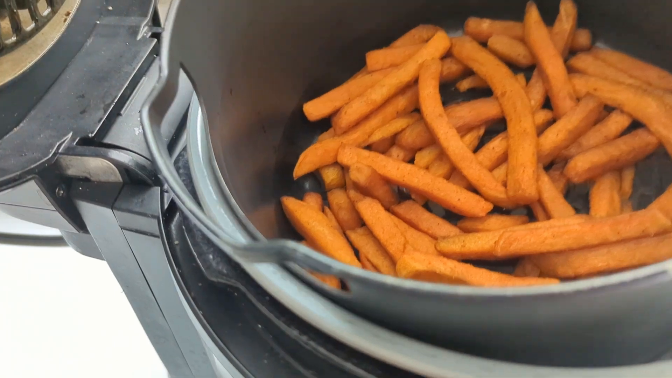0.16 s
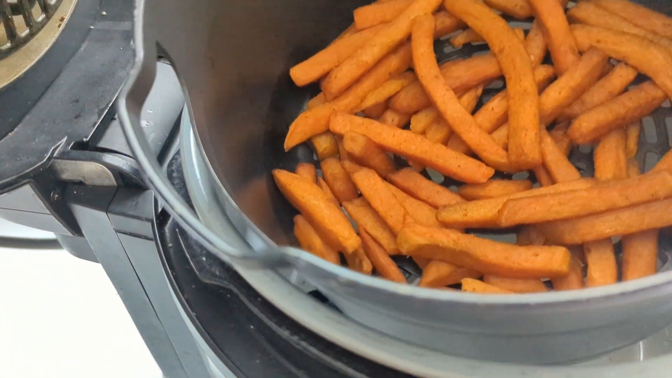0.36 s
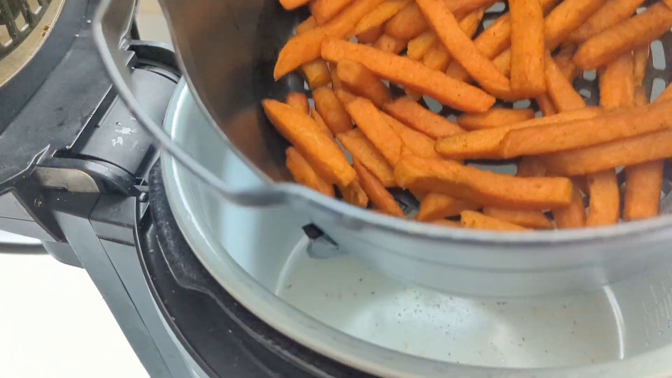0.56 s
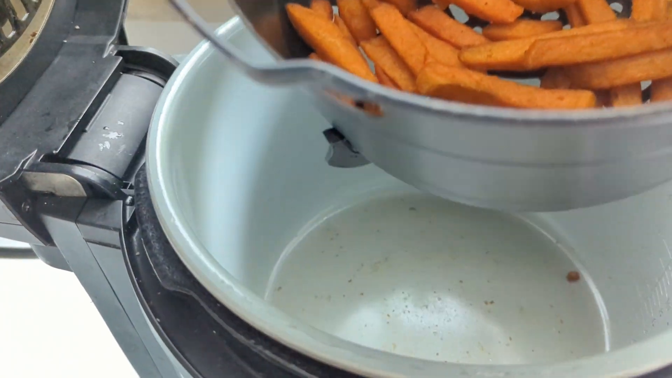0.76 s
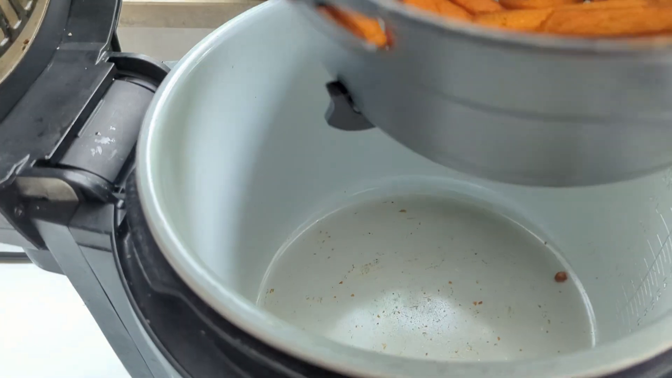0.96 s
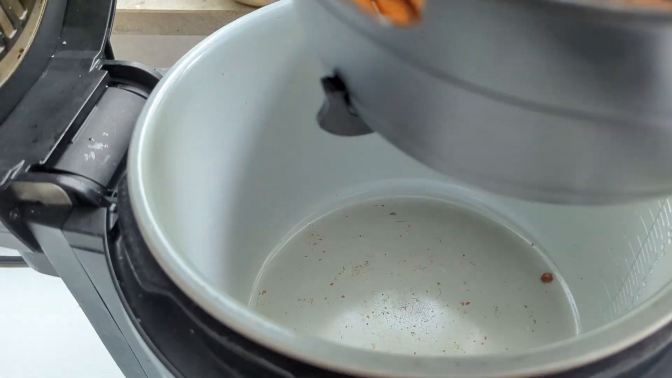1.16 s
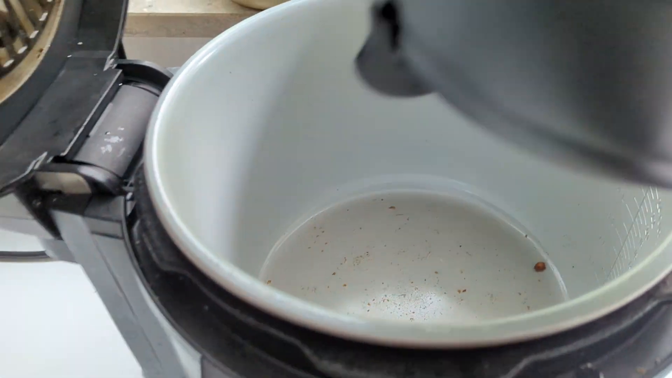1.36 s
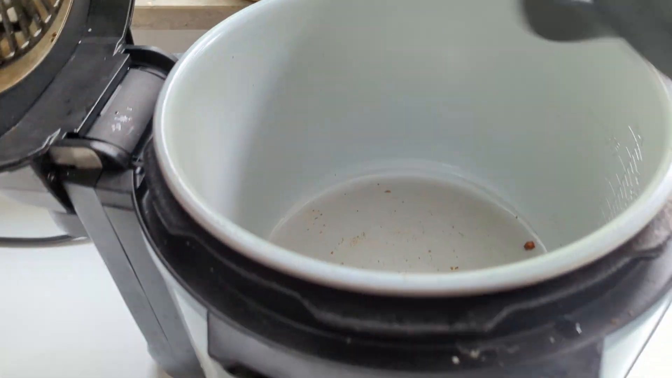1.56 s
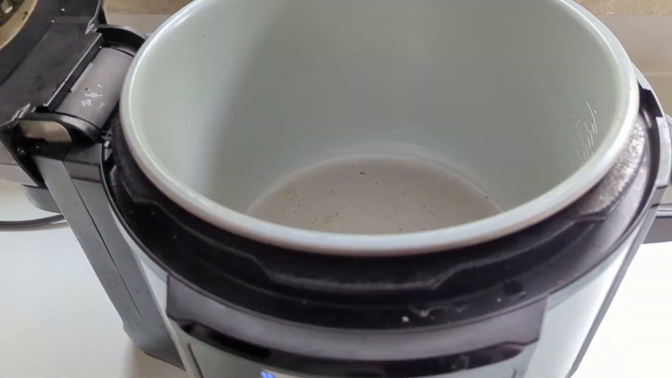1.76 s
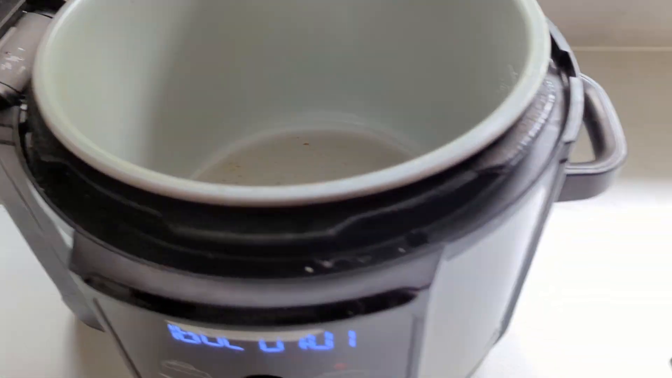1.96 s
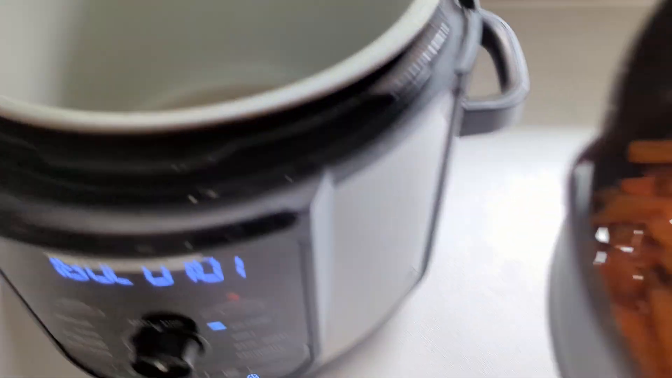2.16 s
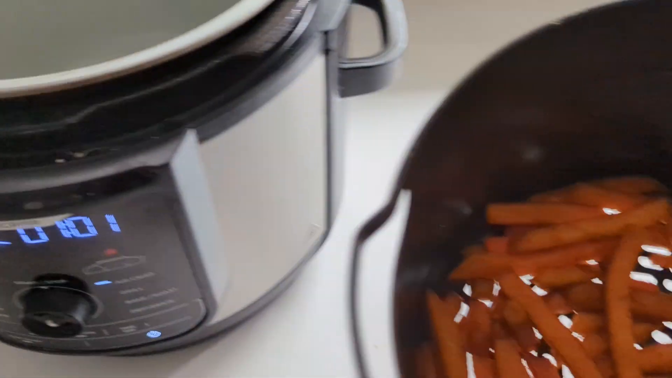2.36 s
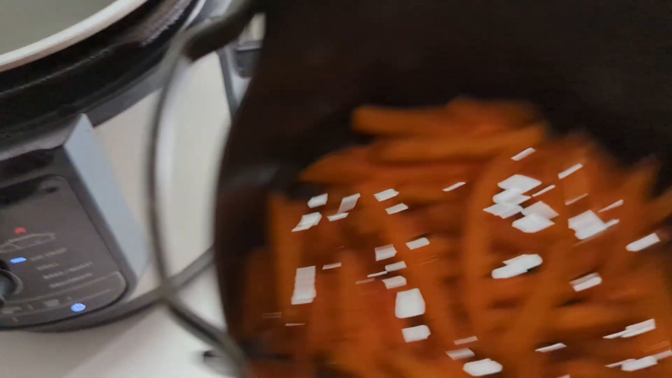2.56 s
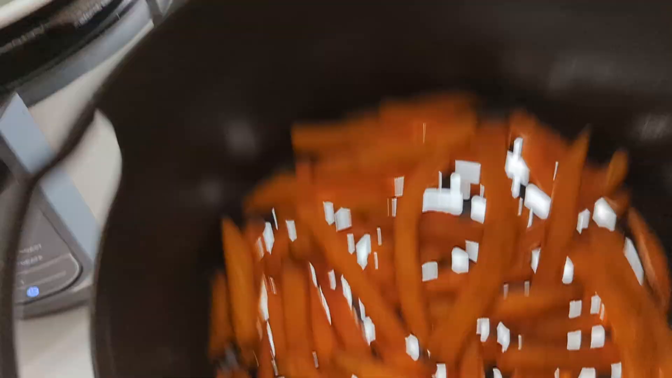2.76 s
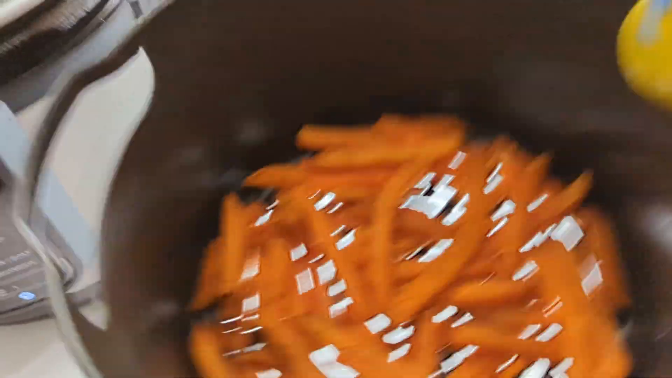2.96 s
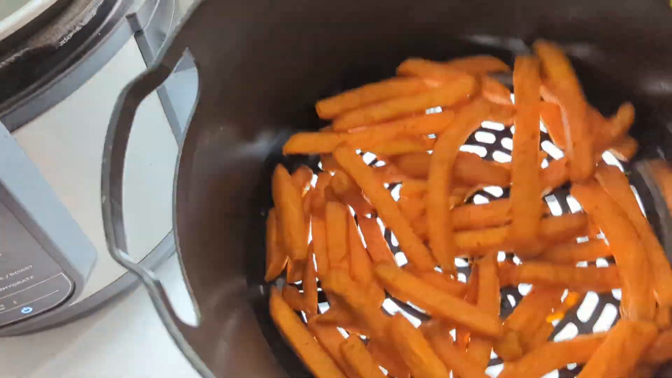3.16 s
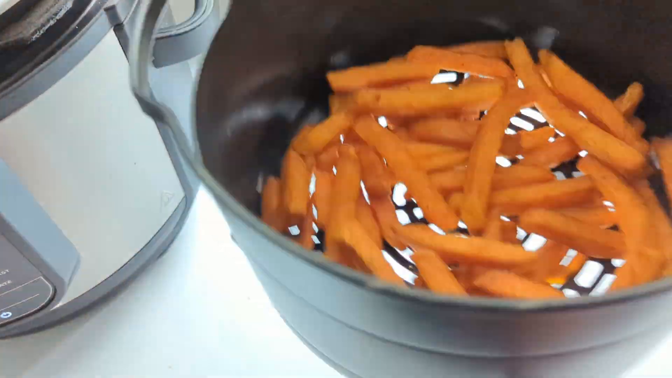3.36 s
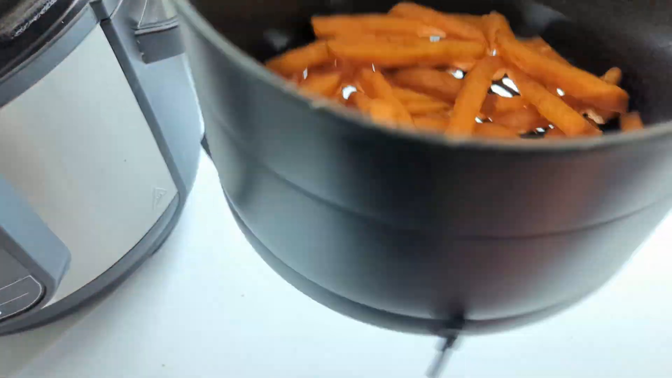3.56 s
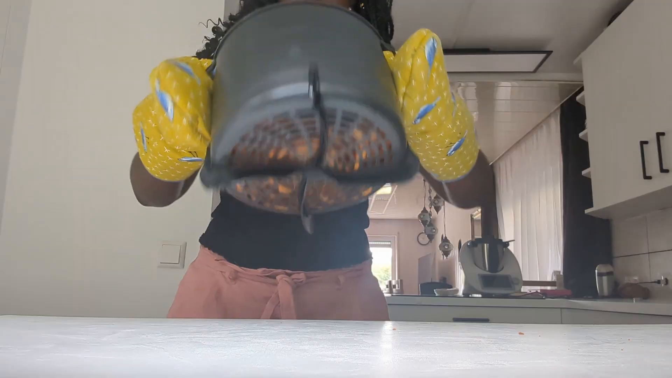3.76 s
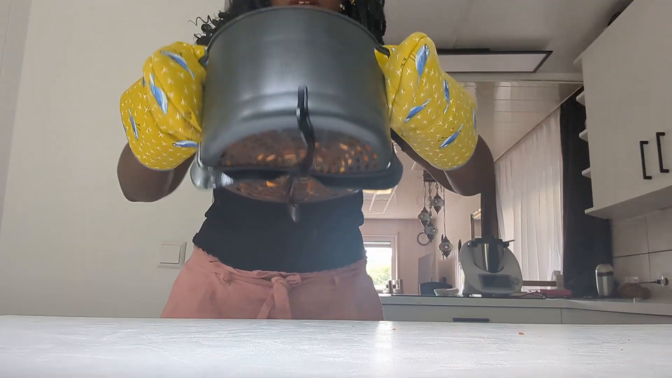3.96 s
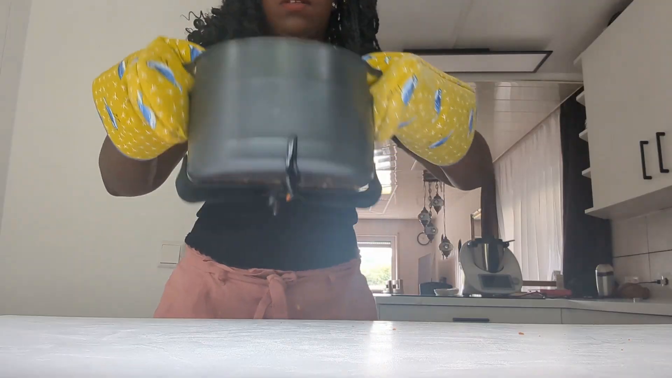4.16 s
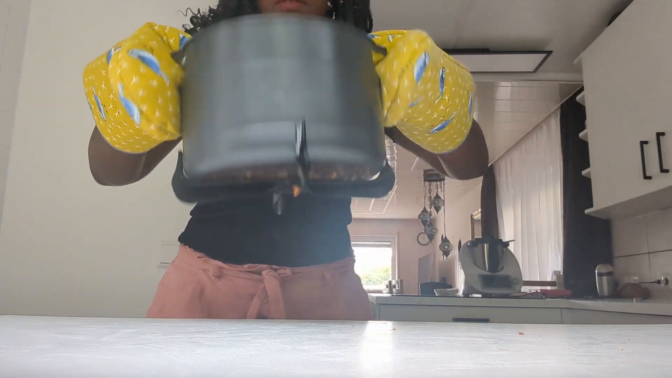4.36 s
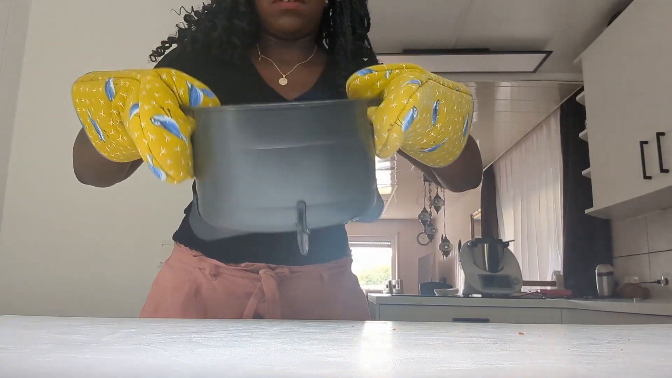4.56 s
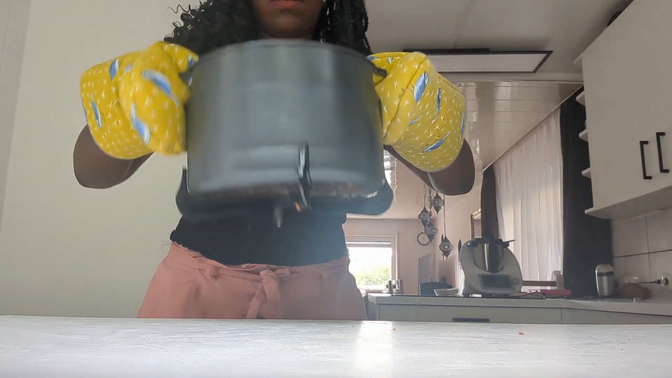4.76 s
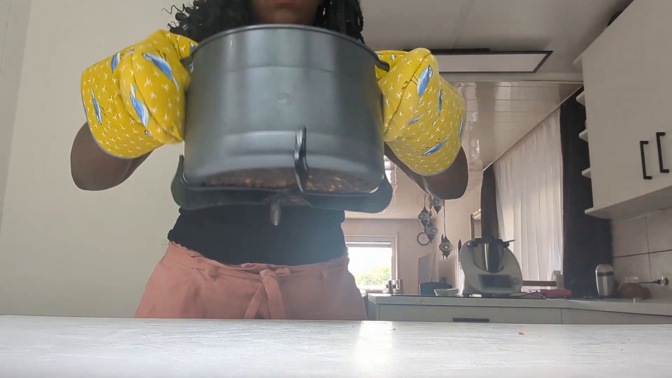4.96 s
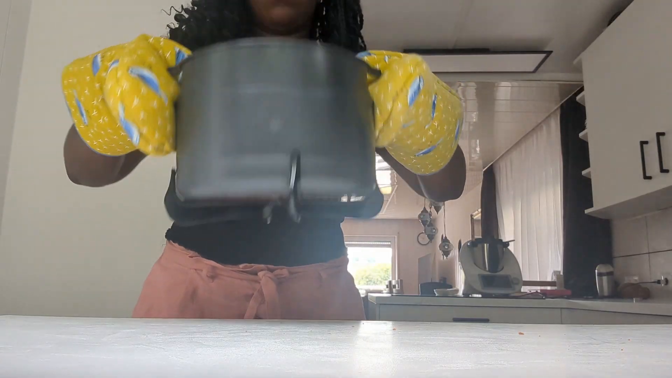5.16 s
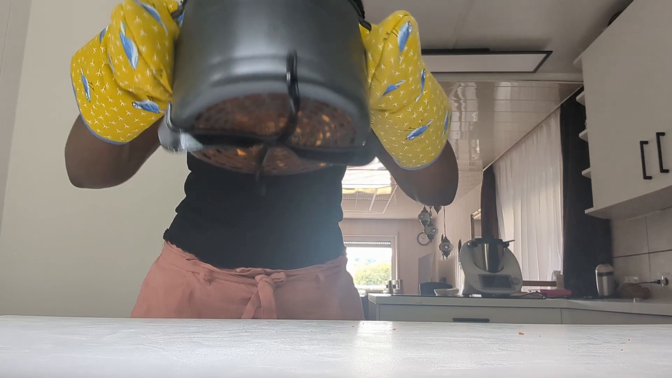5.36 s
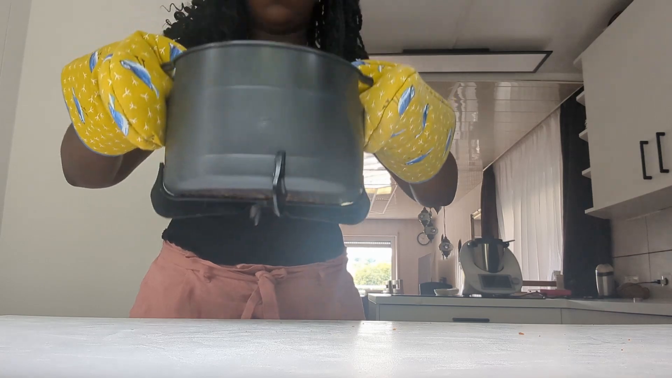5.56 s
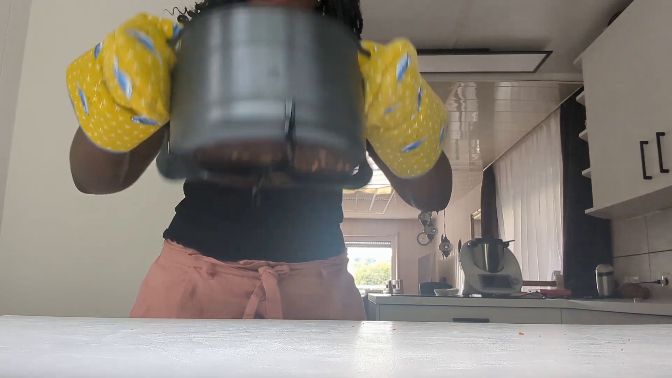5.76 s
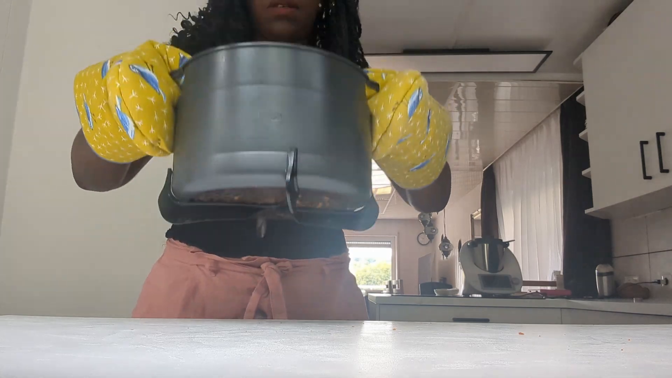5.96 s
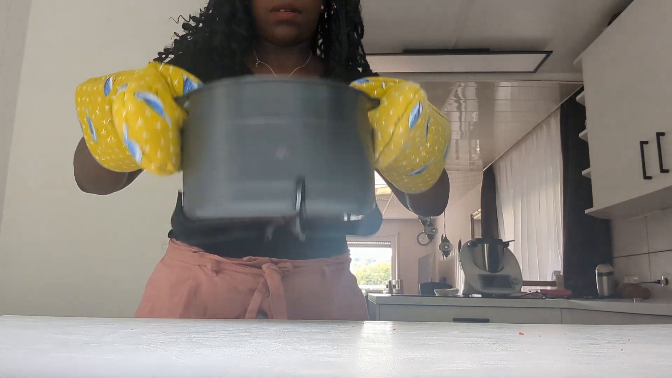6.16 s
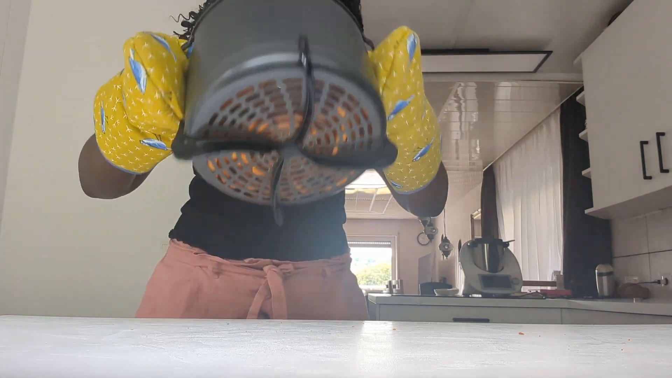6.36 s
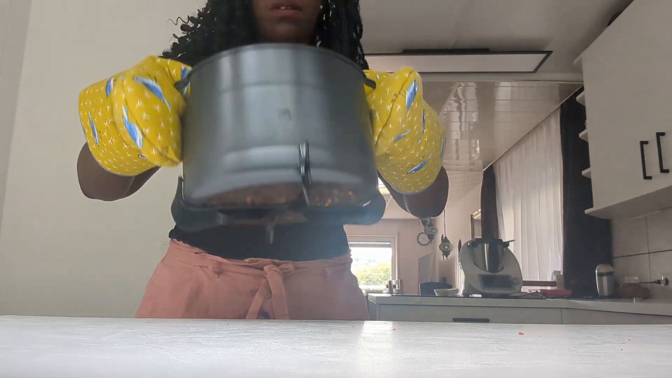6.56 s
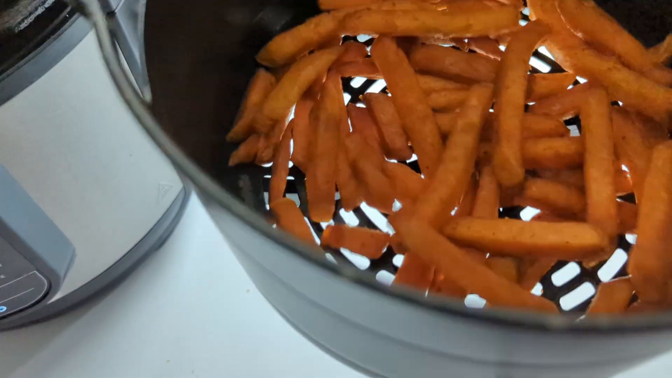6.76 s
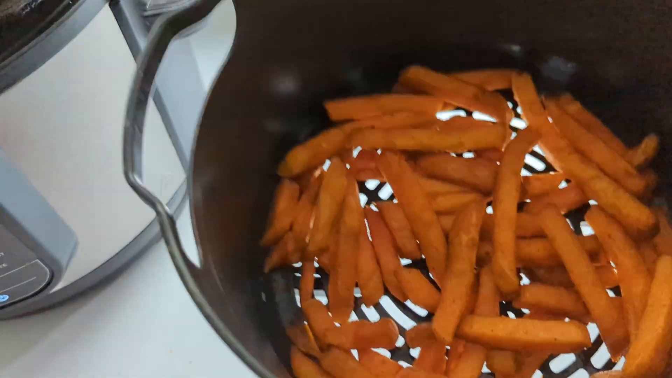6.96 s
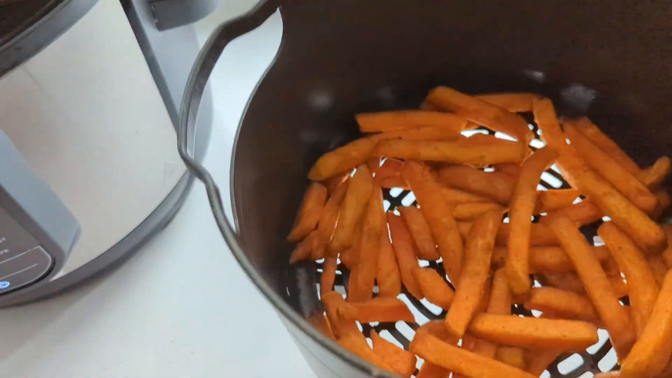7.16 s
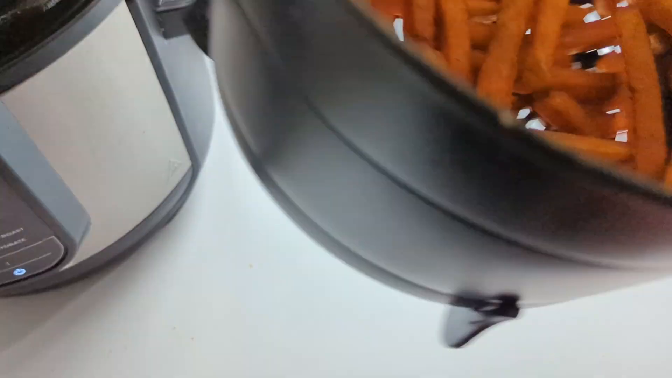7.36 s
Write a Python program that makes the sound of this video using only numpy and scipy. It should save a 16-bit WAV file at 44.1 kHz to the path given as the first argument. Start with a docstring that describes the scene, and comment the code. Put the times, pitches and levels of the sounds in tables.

```python
"""First heard is a metal air fryer basket dragged out of its pot: scrapes, pot thuds and rim clanks. One hard
knock excites the ringing of a small live kitchen and near echoes, all as decaying modes and noise. Fries slide
close by, then are tossed farther off: random grains are coloured by resonances and swell, hold and settle with
each stroke, while bursts of grains make clumps thud, slap and crackle on the perforated floor. Narrow noise
bands and a wavering sine give the faint appliance hum and a low-mid murmur; shaped noise gives rumble and hiss."""
import sys
import numpy as np
from scipy import signal
from scipy.fft import rfft, irfft, next_fast_len
from scipy.io import wavfile
from scipy.ndimage import uniform_filter1d

SR = 44100
rng = np.random.default_rng(int(sys.argv[2]) if len(sys.argv) > 2 else 0)


def put_to_file(sound):
    """Save the sound as 16-bit audio at rate SR, in the file named by the first command-line argument."""
    columns = np.atleast_2d(sound).T  # one column per channel
    safe = np.clip(columns, -1, 1)
    whole_steps = np.round(safe * 32767)
    wavfile.write(sys.argv[1], SR, whole_steps.astype(np.int16))


N = 327632
TIME = np.arange(N) / SR
RING = TIME[:SR // 2]  # time axis of a single hit, half a second
TOP_HZ = 15900  # upper band limit

# Levels in these tables are relative: each source adds its own trim.
# Tosses, each sending the heap across the basket: start_s, hold_s, level_db, brightness_db
TOSSES = [(3.888, 0.012, -50, -4.5), (3.925, 0.021, -49, -0.5), (4.137, 0.031, -46, 0),
          (4.385, 0.014, -52, -2.5), (4.495, 0.011, -49.5, 6.5), (4.575, .05, -51.5, 0.5),
          (4.795, 0.005, -58, 0), (4.935, 0.0067, -59.5, 3), (5.005, 0.065, -57, 4),
          (5.25, 0.023, -56, 0.5), (5.465, .02, -66, 5.5), (5.56, .07, -57.5, 2), (5.7, 0.018, -66, 1),
          (5.91, 0.022, -69.5, 8.5), (6.0, 0.058, -53.5, 3), (6.15, .04, -72.5, -4),
          (6.375, 0.061, -61.5, 8), (6.505, 0.05, -56, 3)]
# Slides of the fries in the tilting basket: start_s, hold_s, level_db, brightness_db
SLIDES = [(1.11, 0.055, -68.5, 4), (1.3, 0.18, -76, -3), (1.8, 0.14, -75, -2), (2.08, 0.087, -67, -6.5),
          (2.29, 0.18, -60, -6.5), (2.595, 0.082, -51, -4.5), (2.83, 0.043, -52.5, -4.5),
          (3.12, 0.037, -54, -3), (3.24, 0.017, -60, 6.5), (3.31, 0.044, -57.5, -4.5),
          (3.405, 0.023, -57, 4), (3.47, .035, -58, -3.5), (3.59, .03, -63, 9), (3.675, 0.02, -54, -0.5),
          (6.76, 0.076, -66.5, 3), (6.92, .02, -69, 3), (7.34, .03, -69, -10.5), (7.41, .02, -65, 7.5)]
# Clumps landing on the floor, soft ones dull and crusty ones bright: start_s, level_db, brightness_db
LANDINGS = [(2.588, -43.5, -2.5), (2.943, -49, 1.5), (3.055, -51, 4.5), (3.082, -57.5, 15), (3.18, -40, -5),
            (3.236, -52, 16.5), (3.338, -48, -2), (3.508, -47, -1), (3.886, -34.5, -4.5), (3.922, -36, 2.5),
            (4.114, -46.5, 0.5), (4.135, -33.5, -5.5), (4.200, -39, -3.5), (4.368, -44, -4.5),
            (4.429, -48.5, 17), (4.467, -42.5, 4.5), (4.542, -47.5, -14), (4.788, -54, -13),
            (4.992, -44.5, 3), (5.020, -56, -13), (5.046, -48.5, -25), (5.183, -63, -12),
            (5.518, -49, -0.5), (5.614, -47.5, 9.5), (5.793, -64, 11.5), (5.969, -54, 7), (6.028, -55, -4),
            (6.449, -51, 4), (6.734, -57.5, 6), (6.920, -63, 16)]
# Jump of the whole heap at the knock: delay_s, slap_level_db, crackle_level_db
JOLT = (.007, -23.5, -37.5)
# Brief dip of the rustle: middle_s, half_length_s, depth_db
LULL = (6.272, 0.047, 11)
# Stretch heard from farther off: start_s, end_s
FAR_SPAN = (3.733, 6.73)
# Spectrum of soft tumbling and floor thuds: frequency_hz, density_db_per_hz
THUD_SPECTRUM = [(30, -49.5), (65, -22.5), (140, -2.5), (260, 0), (380, 2), (560, 1.5), (800, -10.5),
                 (1500, -33.5), (4000, -66)]
# Spectrum of fries slapping the floor: frequency_hz, density_db_per_hz
SLAP_SPECTRUM = [(300, -18), (700, -5.5), (1300, -1.5), (2000, -1), (2600, -8), (5000, -20), (15000, -48)]
# Spectrum of fries rubbing: frequency_hz, density_db_per_hz
RUB_SPECTRUM = [(400, -30.5), (800, 2.5), (1400, 1), (2100, 4), (3600, -0.5), (4800, -2.5), (7000, -35.5)]
# Spectrum of scratching crusts: frequency_hz, density_db_per_hz
CRUST_SPECTRUM = [(1800, -56.5), (3300, -7), (5000, -9), (6200, -4), (8500, -6), (12000, -4.5),
                  (15800, -9.5)]
# Resonances of the basket's wall: frequency_hz, width_hz, level_db
SHELL_MODES = [(1915, 55, -3.5), (2616, 65, 0.5), (3150, 70, -2), (3680, 61, -4.5), (5330, 63, -20.5),
               (6130, 190, -9), (5800, 64, -14), (6920, 140, -5), (7510, 75, 3), (8700, 170, 1.5),
               (9880, 68, -2), (10150, 190, -2), (11700, 120, -7)]
# Bumps of basket against pot: start_s, thud_db, thud_pitch_hz, thud_rise_s, tap_db, clank_db
BUMPS = [(0.031, -48, 315, 0.066, -50.5, -79), (0.146, -34.5, 294, 0.0016, -60.5, -57),
         (0.461, -49.5, 239, 0.01, -70, -61), (0.892, -38.5, 297.6, 0.0089, -47, -32),
         (0.899, -37, 279.6, 0.0015, -52.5, -53), (0.917, -45, 237, 0.0013, -62, -47.5),
         (0.938, -40.5, 246, 0.00066, -52, -64), (1.060, -49, 254, 0.0025, -48.5, -64)]
# Modes of the pot: multiple_of_thud_pitch (ratio), level_db, t60_s
POT_MODES = [(.46, -17, 0.22), (.68, 0, 0.12), (1, 9.5, 0.074), (1.3, -3, 0.098), (1.76, -7, .11),
             (3.42, -14, 0.1)]
# Drags along the pot wall: start_s, hold_s, level_db
SCRAPES = [(0.023, 0.024, -55.5), (0.114, 0.055, -55), (0.276, .05, -55), (0.348, 0.12, -55)]
# Spectrum of contact with the pot wall: frequency_hz, density_db_per_hz
POT_WALL_SPECTRUM = [(700, -15.5), (1050, -5.5), (1400, 0), (2000, -13), (3500, -20.5), (6000, -15),
                     (9000, -26), (15000, -18)]
# Spectrum of metal chatter: frequency_hz, density_db_per_hz
CLANK_SPECTRUM = [(700, -16), (1300, -5.5), (2200, -11.5), (3400, -10.5), (4600, -7), (6500, -7.5),
                  (8000, -14.5), (11000, -19.5), (15000, -40)]
# Resonances of the basket's rim: frequency_hz, width_hz, level_db
RIM_MODES = [(1390, 94, 7), (1890, 84, 3), (2230, 180, 11.5), (2640, 90, 5), (2800, 160, 9),
             (3280, 300, 3.5), (4200, 440, -5), (6450, 400, -2.5)]
# Slowest-dying cluster of rim modes: frequency_hz, width_hz, level_db, t60_s
RIM_TAIL = (2697, 597, -16, 0.15)
# Spectrum of the knock's pulse: frequency_hz, density_db_per_hz
KNOCK_SPECTRUM = [(60, -58.5), (150, -28), (340, -20.5), (480, -8.5), (680, -9.5), (850, -1), (1280, -0.5),
                  (1600, -11), (2000, -23.5), (2900, -22), (4000, -39), (7000, -40.5), (15000, -63)]
# Ringing of the small room after the knock: frequency_hz, level_db, t60_s
ROOM_MODES = [(510, -13.5, 0.25), (605, -7, .18), (700, -13.5, .35), (858, -6, .35), (943, -4.5, .28),
              (1052, -4, .25), (1043, -2.5, .3), (1130, -4, .27), (1188, -2, .31), (1260, -10, .36),
              (1310, -4, .25), (1350, -4.5, 0.44), (1418, -9, .37), (1496, -9, .35)]
# Spectrum of the low body under the knock: frequency_hz, density_db_per_hz
BOOM_SPECTRUM = [(30, -38.5), (70, -12), (105, -15.5), (150, -0.5), (250, -1.5), (350, -1.5), (600, -27),
                 (1500, -61)]
# Echoes of the knock from near walls: left_delay_s, right_delay_s, level_db
ECHOES = [(.0053, .0058, -6.5), (0.0148, 0.014, -4), (0.0189, .0161, -4), (.0283, 0.021, -3.5),
          (.0326, .0327, -8), (0.045, .0436, -4)]
# Squeaks, mitt rubs, swishes and wall rings: middle_s, frequency_hz, width_hz, length_s, level_db
SQUEAKS_AND_RUBS = [(1.37, 380, 300, 0.22, -71), (2.101, 2620, 900, 0.08, -65.5),
                    (2.859, 2450, 1490, 0.085, -55), (3.145, 380, 150, 0.045, -57.5),
                    (3.481, 1900, 220, 0.066, -61), (3.71, 467, 403, .08, -61.5),
                    (3.858, 583, 200, 0.12, -62), (3.927, 3600, 257, 0.014, -40),
                    (3.978, 2594, 220, .03, -50), (4.052, 576, 170, .08, -59.5),
                    (4.138, 2620, 180, 0.018, -47), (4.432, 2600, 200, 0.019, -55),
                    (4.505, 6150, 800, 0.053, -47.5), (4.64, 460, 360, 0.22, -58),
                    (4.938, 2640, 250, .03, -61), (5.216, 610, 164, 0.09, -63.5),
                    (5.699, 2690, 300, 0.027, -59), (5.925, 3640, 600, 0.037, -63.5)]
# Bands of the appliance drone, and a wider low-mid murmur near 635 Hz: frequency_hz, width_hz, level_db,
# extra_db_when_far
HUM_BANDS = [(67, 11, -83.5, 10.5), (149.2, 14, -77.5, 7.5), (179.4, 16, -95.5, 12), (635, 130, -89.5, 11)]
# Tone of a small motor: frequency_hz, level_db, extra_db_when_far
WHINE = (469, -77, 7.9)
# Spectrum of the room's rumble: frequency_hz, density_db_per_hz
RUMBLE_SPECTRUM = [(20, -21.5), (40, -6), (65, -2.5), (110, -5), (160, -4), (300, -3), (430, -4.5),
                   (700, -10.5), (1300, -13), (1900, -14.5), (3000, -40.5)]
# Spectrum of the fine hiss: frequency_hz, density_db_per_hz
HISS_SPECTRUM = [(900, -12), (1850, -5), (2400, -3.5), (4500, -4.5), (6500, -3), (9000, -2), (12000, 0),
                 (15800, -2)]
# Course of the hiss: time_s, level_db
HISS_LEVELS = [(0, -60), (0.45, -60.5), (0.85, -61.5), (1.15, -62), (1.4, -64.5), (1.6, -65), (1.9, -65),
               (2.5, -61.5), (6.7, -65)]
# Reverberation time of the kitchen: frequency_hz, t60_s
KITCHEN_DECAY = [(100, 0.63), (300, 0.27), (1200, 0.39), (3000, 0.45), (8000, 0.32), (15000, 0.15)]
# Coherence of the diffuse field: frequency_hz, left_right_correlation (-1 to 1)
COHERENCE = [(60, 0.75), (160, 0.95), (380, .62), (800, -0.15), (1300, 0.11), (2400, -0.054), (6000, .02)]

KNOCK_S = 2.3638
SWELL_DB_PER_S, SETTLE_DB_PER_S = 387, 199.5  # slopes of a toss
DULL_SHARE = 0.64  # dB of bass lost for each dB of brightness
CARRY_S, CREEP_DB = 1.95, -70  # the carried fries creep from this time on, at this relative level
JOSTLE_DB, JOSTLE_FADE_DB_PER_S = -68.5, 2  # relative level of the shaking between tosses, and its fade
LOAD_DETUNE = 0.03  # spread of the loaded wall's resonances, as a share of their pitch


def tossing():
    """Granular flow under forcing: farther off, the heap surges with every throw and catch."""
    middle, half, depth_db = LULL
    lull = amp(-depth_db * np.exp(-((TIME - middle) / half) ** 4))
    # between tosses the fries never quite rest, but the shaking grows gentler
    jostle = amp(JOSTLE_DB - JOSTLE_FADE_DB_PER_S * (TIME - FAR_SPAN[0])) * far_off()
    levels = motion(TOSSES, SWELL_DB_PER_S, SETTLE_DB_PER_S, jostle) * lull
    return rustle(*levels, per_s=700, patchy_db=3.0, bunch_db=4.5, wet_db=1.5,
                  shell_db=7.5, crust_shell_db=1, tumble_db=-3, pat_db=-10,
                  rub_db=-1.5, tick_db=-5.5, crisp_db=2)


def sliding(swell=400, settle=160):
    """Sliding friction: close by, the fries creep in the carried basket and slide whenever it tilts."""
    creep = amp(CREEP_DB) * (TIME > CARRY_S) * (TIME < FAR_SPAN[0])
    levels = motion(SLIDES, swell, settle, creep) * ~far_off()
    return rustle(*levels, per_s=1600, patchy_db=4.0, bunch_db=3.7, wet_db=3.0,
                  shell_db=-17, crust_shell_db=-12, tumble_db=-13.5, pat_db=-9,
                  rub_db=-0.5, tick_db=-7, crisp_db=3.5)


def rustle(tumbling, rubbing, crisp, per_s, patchy_db, bunch_db, wet_db,
           shell_db, crust_shell_db, tumble_db, pat_db, rub_db, tick_db, crisp_db):
    """Superposed random contacts: fries tumble, pat the floor, rub and tick the wall, and scratch with crusts."""
    bunches = amp(bunch_db * narrow(N, 0, 130))  # contacts grow stronger and weaker in bunches
    tumble_grains = np.tile(grains(N, per_s=300, scatter=0.6)[:1], (2, 1))
    tumble = colour(bunches * tumble_grains, THUD_SPECTRUM)
    pat_grains = np.tile(grains(N, per_s=100, scatter=0.27)[:1], (2, 1))
    pats = colour(pat_grains, SLAP_SPECTRUM)
    rub_grains = bunches * grains(N, per_s, scatter=0.59)
    rub = patchy(colour(rub_grains, RUB_SPECTRUM, SHELL_MODES, shell_db), patchy_db)
    crust_grains = np.sqrt(bunches) * grains(N, per_s * 3, scatter=0.4)
    crust = patchy(colour(crust_grains, CRUST_SPECTRUM, SHELL_MODES, crust_shell_db), depth_db=3.0)
    layers = [(tumble, tumbling, tumble_db), (pats, rubbing, pat_db), (rub, rubbing, rub_db),
              (ticks(per_s=80, t60=0.028), rubbing, tick_db), (crust, crisp, crisp_db)]
    return sum(amp(db) * level * unit(kitchen(x, wet_db)) for x, level, db in layers)


def ticks(per_s, t60):
    """Impulse response of a mode: single fries tap the wall, each ringing one resonance slightly detuned."""
    out = np.zeros((2, N))
    t = RING[:SR // 25]
    decay = amp(-60 * t / t60)
    for when, which, detune, size, phase in rng.random((round(per_s * N / SR), 5)):
        mode = int(which ** 2 * 7)  # favours the lowest of the first seven
        hz = SHELL_MODES[mode][0] * (0.9 + 0.2 * detune)
        waves = np.sin(2 * np.pi * (hz * t + np.array([[0], [phase]])))
        add(out, when * (N - 1) / SR, (0.23 + size ** 2) * waves * decay)
    return out


def motion(rows, swell, settle, rest):
    """Power addition: gains of tumbling, rubbing and scratching; brighter strokes scratch more, tumble less."""
    power = np.tile(rest ** 2, (3, 1))
    for s, hold, db, bright_db in rows:
        levels_db = [[db - DULL_SHARE * bright_db], [db], [db + bright_db]]
        power += (amp(levels_db) * stroke(s, hold, swell, settle)) ** 2
    return np.sqrt(power)


def stroke(s, hold, swell, settle):
    """Exponential growth and decay: gain swells up to s, holds and settles; slopes in dB per second."""
    before = np.maximum(s - TIME, 0)
    after = np.maximum(TIME - s - hold, 0)
    return amp(-np.minimum(swell * before + settle * after, 200))


def far_off():
    """Source distance: true while the basket is heard from farther off."""
    return (TIME > FAR_SPAN[0]) & (TIME < FAR_SPAN[1])


def landings(thud_db=-4, slap_db=-1, crackle_db=-6, close_thud_db=-6):
    """Impact excitation: the heap jumps at the knock, and clumps fall back with the tilts and tosses."""
    out = np.zeros((2, N))
    delay, jolt_slap_db, jolt_crackle_db = JOLT
    add(out, KNOCK_S + delay, clump(-np.inf, jolt_slap_db, jolt_crackle_db))  # no thud here
    for s, db, bright_db in LANDINGS:
        is_far = FAR_SPAN[0] < s < FAR_SPAN[1]
        floor_db = thud_db if is_far else thud_db + close_thud_db
        landing = clump(db + floor_db - DULL_SHARE * bright_db, db + slap_db, db + crackle_db + bright_db)
        add(out, s, landing)
    return out


def clump(thud_db, slap_db, crackle_db):
    """Distributed impact: the floor thuds, the fries slap it, and their crusts crackle as they settle."""
    wall = loaded_shell()
    thud = crest(colour(blow(patter=0.066, t60=0.039), THUD_SPECTRUM))
    slap_contacts = burst(per_s=5000, t60=0.033) + blow(patter=0.051, t60=0.0063)
    slap = crest(patchy(colour(slap_contacts, SLAP_SPECTRUM, wall, peak_db=-8), depth_db=4))
    crust_contacts = burst(per_s=14000, t60=0.094)
    crackle = crest(patchy(colour(crust_contacts, CRUST_SPECTRUM, wall, peak_db=4), depth_db=1.5))
    return kitchen(amp(thud_db) * thud + amp(slap_db) * slap + amp(crackle_db) * crackle, wet_db=-3)


def loaded_shell():
    """Mass loading: the heap shifts the wall's resonances at random, anew at each landing."""
    shifts = rng.standard_normal(len(SHELL_MODES))
    return [(hz * np.exp(LOAD_DETUNE * shift), width, db)
            for (hz, width, db), shift in zip(SHELL_MODES, shifts)]


def lift(scrape_db=-2):
    """Friction and impact: the basket drags up the pot wall; bumps thump the pot and make the rim chatter."""
    out = np.zeros((2, N))
    for s, thud_db, pitch, rise, tap_db, clank_db in BUMPS:
        modes = [(pitch * ratio, db, t60) for ratio, db, t60 in POT_MODES]
        thud = ring(modes, spread=0.11) * (1 - np.exp(-RING / rise))
        tap = colour(burst(per_s=8700, t60=0.043), POT_WALL_SPECTRUM)
        add(out, s, amp(thud_db) * crest(kitchen(thud, wet_db=-5.0)))
        add(out, s, kitchen(amp(tap_db) * crest(tap) + amp(clank_db) * clank(), wet_db=-11.5))
    contacts = grains(N, per_s=1200, scatter=0.51)
    scrape = patchy(colour(contacts, POT_WALL_SPECTRUM, SHELL_MODES, peak_db=9), depth_db=2.5)
    drag = np.max([amp(db) * stroke(s, hold, swell=400, settle=210) for s, hold, db in SCRAPES], axis=0)
    return out + amp(scrape_db) * drag * unit(kitchen(scrape, wet_db=0.5))


def clank():
    """Repeated metal contact: chatter excites the rim, and one cluster of its modes rings on."""
    hz, width, db, t60 = RIM_TAIL
    chatter = colour(burst(per_s=12000, t60=0.063), CLANK_SPECTRUM, RIM_MODES, peak_db=12)
    tail = np.array([narrow(len(RING), hz, width), narrow(len(RING), hz, width)])
    return crest(chatter) + amp(db - 60 * RING / t60) * tail


def knock(level_db=-15, reverb_db=4, room_ring_db=-12, boom_db=-14, boom_s=0.0112):
    """Impulse excitation: a short pulse, near-wall echoes, the ringing room, a delayed low boom and reverberation."""
    pulse = crest(colour(blow(patter=0.002, t60=0.02), KNOCK_SPECTRUM))
    hit = kitchen(pulse, reverb_db, gap=0.0018)
    for left_s, right_s, db in ECHOES:
        add(hit[:1], left_s, amp(db) * pulse[0])
        add(hit[1:], right_s, amp(db) * pulse[1])
    room_ring = ring(ROOM_MODES, spread=1.7) * (1 - np.exp(-RING / 0.005))
    hit += amp(room_ring_db) * crest(room_ring)
    boom = crest(colour(blow(patter=0.01, t60=0.036), BOOM_SPECTRUM))
    add(hit, boom_s, amp(boom_db) * kitchen(boom, wet_db=-2.0))
    out = np.zeros((2, N))
    add(out, KNOCK_S, amp(level_db) * hit)
    return out


def squeaks_and_rubs():
    """Band-limited noise: each squeak, rub, swish or wall ring swells and fades in its own band."""
    out = np.zeros((2, N))
    middle = RING.mean()
    for s, hz, width, length, db in SQUEAKS_AND_RUBS:
        swell = np.exp(-(2 * (RING - middle) / length) ** 2)
        add(out, s - middle, amp(db) * swell * narrow(len(RING), hz, width))
    return kitchen(out, wet_db=-4.5)


def background():
    """Incoherent superposition of the room's rumble, the appliance hum with a low-mid murmur, its motor tone
    and a fine hiss."""
    return rumble() + hum() + whine() + hiss()


def rumble(level_db=-67, far_db=2.0):
    """Diffuse field: low-weighted noise from all around, slightly louder in the far stretch."""
    return amp(level_db + far_db * far_off()) * unit(colour(diffuse(N), RUMBLE_SPECTRUM))


def hum():
    """Narrow-band noise: each band of the drone and the low-mid murmur wavers at random and is louder when far."""
    return sum(amp(db + extra_db * far_off()) * narrow(N, hz, width) for hz, width, db, extra_db in HUM_BANDS)


def whine(drift_rad=0.25):
    """Phase modulation: a steady motor tone whose speed wanders slightly."""
    hz, db, extra_db = WHINE
    phase = 2 * np.pi * hz * TIME + drift_rad * narrow(N, 0, 20)
    return amp(db + extra_db * far_off()) * unit(np.sin(phase))


def hiss(trim_db=1):
    """Diffuse treble noise, heard only close to the fryer."""
    level_db = np.interp(TIME, *np.transpose(HISS_LEVELS)) + trim_db
    return ~far_off() * amp(level_db) * unit(colour(diffuse(N), HISS_SPECTRUM))


def kitchen(x, wet_db, gap=0.0015):
    """Reverberation: x plus a fresh random tail in which each frequency dies at its own speed."""
    hz, t, z = signal.stft(diffuse(len(RING)), SR, nperseg=256)
    decay = amp(-60 * t / along(KITCHEN_DECAY, hz)[:, None])
    tail = signal.istft(z * decay, SR, nperseg=256)[1][:, :len(RING)]
    wet = signal.fftconvolve(x, tail * (RING > gap), axes=1)[:, :x.shape[1]]
    return x + amp(wet_db) * np.std(x) * unit(wet)


def diffuse(n):
    """Interchannel coherence: stereo noise, mostly alike in the bass and nearly unrelated in the treble."""
    def mid_and_side(hz):
        angle = np.arccos(np.clip(along(COHERENCE, hz), -1, 1)) / 2
        return np.array([np.cos(angle), np.sin(angle)])
    mid, side = filtered(rng.standard_normal((2, n)), mid_and_side)
    return np.array([mid + side, mid - side])


def ring(modes, spread):
    """Modal decay: damped sines, each reaching the two channels with its own random phase."""
    phases = spread * rng.standard_normal((len(modes), 2, 1))
    return sum(amp(db - 60 * RING / t60) * np.sin(2 * np.pi * hz * RING + phase)
               for (hz, db, t60), phase in zip(modes, phases))


def grains(n, per_s, scatter):
    """Shot noise: tiny random contacts of log-normal size, with independent left and right gains."""
    sizes = np.exp(scatter * np.clip(rng.standard_normal(n), -2, 2))
    hits = (rng.random(n) < per_s / SR) * sizes
    return hits * rng.standard_normal((2, n))


def burst(per_s, t60):
    """Decaying shot noise: a dying spray of tiny contacts."""
    return grains(len(RING), per_s, scatter=0.37) * amp(-60 * RING / t60)


def blow(patter, t60):
    """Impulse with decay: one push, followed by a dying patter of smaller contacts."""
    x = patter * rng.standard_normal(len(RING)) * amp(-60 * RING / t60)
    x[0] = 1
    return np.array([x, x])


def patchy(x, depth_db, size=(4, 9)):
    """Time-varying colour: random gains that change over some hundred Hz and some tens of ms."""
    z = signal.stft(x, nperseg=256)[2]
    across_hz = uniform_filter1d(rng.standard_normal(z.shape[1:]), size[0], 0)
    field = uniform_filter1d(across_hz, size[1], 1)
    return signal.istft(z * amp(depth_db * unit(field)), nperseg=256)[1][:, :x.shape[1]]


def narrow(n, hz, width):
    """Band-limited noise: rms 1 in one Gaussian band."""
    return unit(filtered(rng.standard_normal(n), lambda f: np.exp(-(2 * (f - hz) / width) ** 2)))


def colour(x, spectrum, peaks=(), peak_db=0, size=4096):
    """Minimum-phase filtering: a causal response from spectrum points, with resonances on top."""
    hz = np.fft.rfftfreq(size, 1 / SR)
    resonances = sum(amp(db + peak_db) / np.hypot(1, 2 * (hz - c) / w) ** 2 for c, w, db in peaks)
    gain = amp(along(spectrum, hz)) * (1 + resonances)
    cepstrum = irfft(np.log(gain + 1e-6))[:size // 2]
    cepstrum[1:] *= 2  # folding the cepstrum forward makes the response causal
    response = irfft(np.exp(rfft(cepstrum, size)))
    return signal.fftconvolve(x, response[None], axes=1)[:, :x.shape[1]]


def filtered(x, response):
    """Linear filtering: x times a response of frequency, zero-padded."""
    n = x.shape[-1]
    m = next_fast_len(n + 8192, True)
    return irfft(rfft(x, m) * response(np.fft.rfftfreq(m, 1 / SR)), m)[..., :n]


def along(points, hz):
    """Interpolation of (frequency_hz, value) points on a logarithmic frequency axis."""
    f, v = np.transpose(points)
    return np.interp(np.log(hz + 1), np.log(f + 1), v)


def amp(db):
    """Logarithmic level: decibels to amplitude gain."""
    return 10 ** (np.asarray(db) / 20)


def unit(x):
    """Power normalisation: x at rms 1."""
    return x / np.sqrt(np.mean(x ** 2) + 1e-20)


def crest(x, size=220):
    """Short-time power: scale a stereo hit so its loudest moment, size samples long, has rms 1."""
    return x / np.sqrt(uniform_filter1d(np.mean(x ** 2, 0), size).max())


def add(track, s, sound):
    """Superposition: mix a sound in at s seconds, cut at the track's end."""
    room_left = track[:, round(s * SR):][:, :sound.shape[-1]]
    room_left += sound[..., :room_left.shape[-1]]


def scene():
    """Superposition of the fries, the basket with its handling, and the background."""
    fries = tossing() + sliding() + landings()
    basket = lift() + knock() + squeaks_and_rubs()
    return fries + basket + background()


def record(dry):
    """Band limiting: nothing at or above the top frequency is kept."""
    return filtered(dry, lambda hz: hz < TOP_HZ)


dry = scene()
out = record(dry)
put_to_file(out)
```